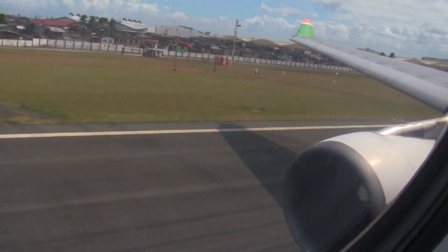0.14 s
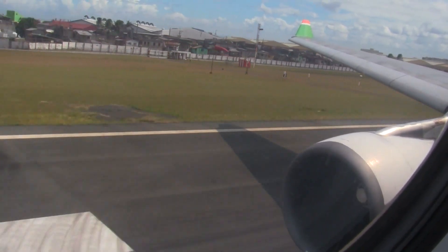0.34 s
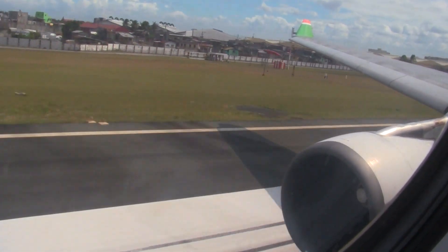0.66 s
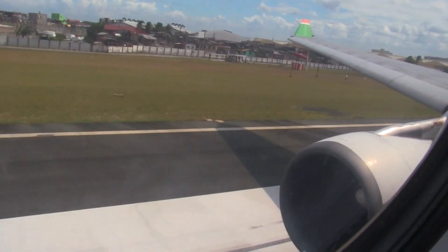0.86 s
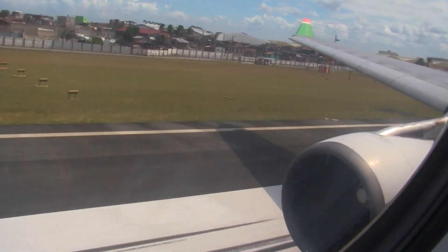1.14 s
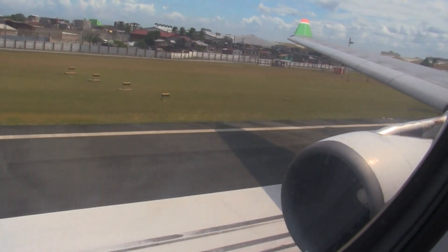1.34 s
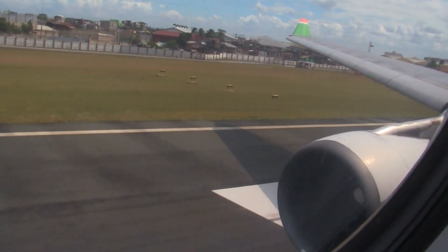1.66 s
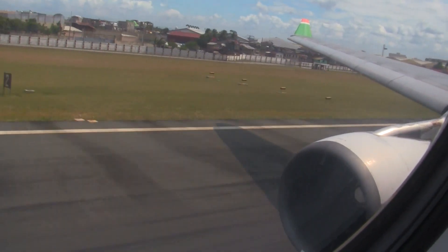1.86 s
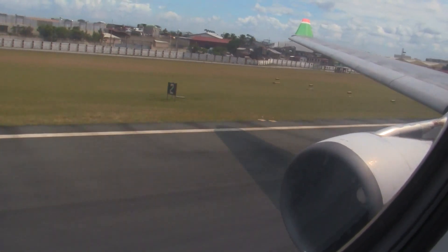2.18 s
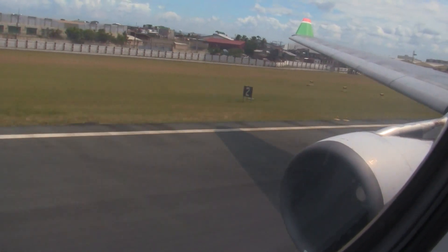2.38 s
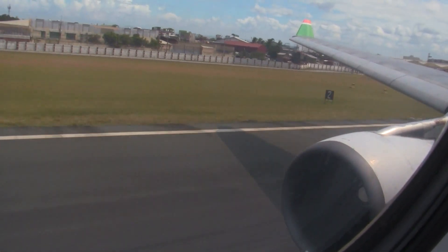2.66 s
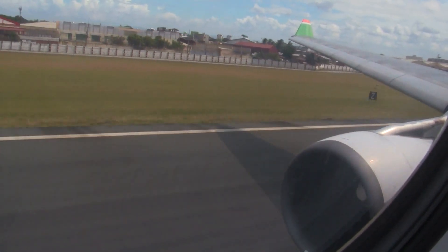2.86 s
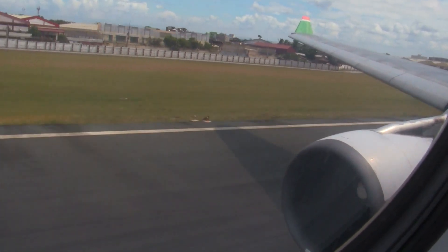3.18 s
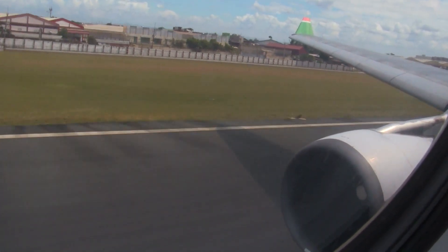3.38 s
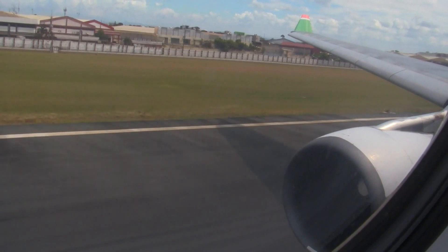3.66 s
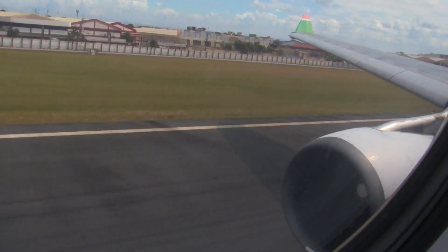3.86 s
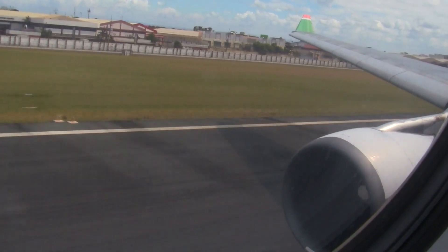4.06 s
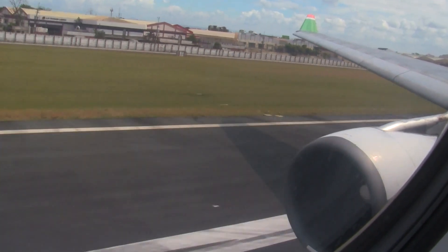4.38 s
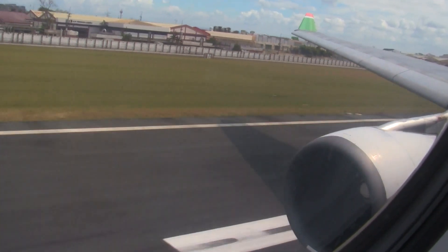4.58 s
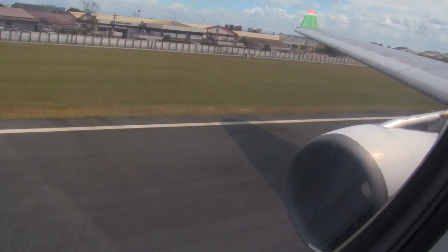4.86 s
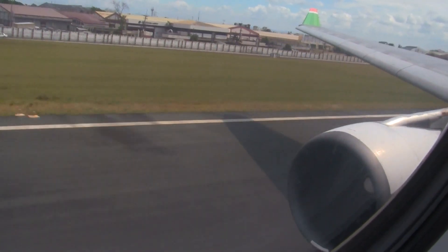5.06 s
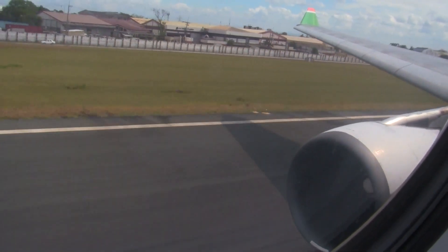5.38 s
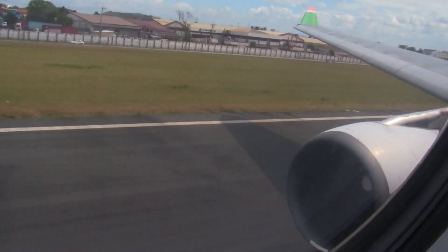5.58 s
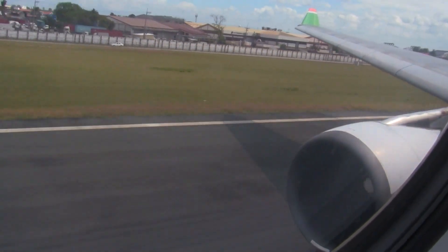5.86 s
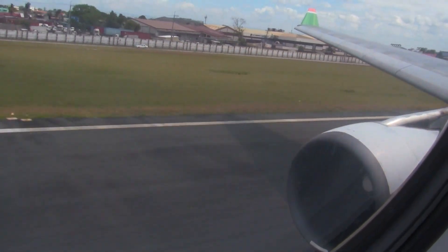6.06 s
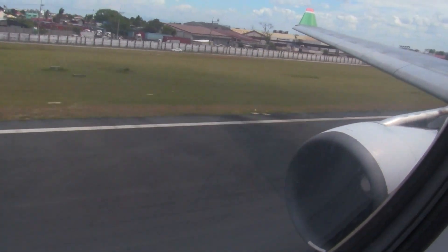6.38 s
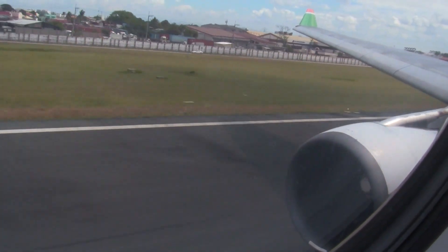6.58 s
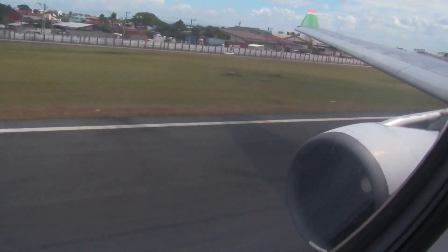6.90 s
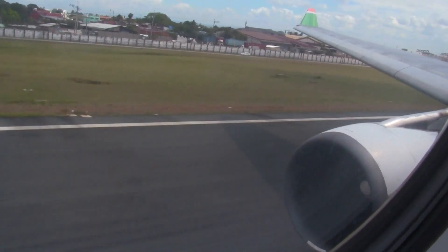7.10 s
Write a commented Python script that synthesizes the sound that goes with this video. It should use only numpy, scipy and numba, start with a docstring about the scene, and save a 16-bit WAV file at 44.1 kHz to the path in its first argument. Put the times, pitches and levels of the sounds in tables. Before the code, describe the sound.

Inside an airliner speeding down a runway, a jet engine roars, buzzes and whines at full thrust over a booming rumble and repeated dull thumps.

```python
"""Airliner cabin, take-off run

From inside the cabin, close beside a big fan engine at full thrust, on a small camera's stereo microphone.
Jet and airflow roar and the cabin air booms near 115 Hz. The fan sings its blade tone and a comb of shaft
orders. Low thumps come and go, the later, evenly spaced ones probably wheels on runway joints.
Loose trim ticks and squeaks, and the camera's limiter ducks everything under the heavy thumps."""
import sys
import numpy as np
from scipy import signal
from scipy.fft import rfft, irfft, next_fast_len
from scipy.io import wavfile
from scipy.ndimage import uniform_filter1d
from numba import njit

SR = 44100
rng = np.random.default_rng(int(sys.argv[2]) if len(sys.argv) > 2 else 0)


def log_audio(samples):
    """Write samples as a 16-bit WAV file to the path given in sys.argv[1]."""
    # one column per channel
    frames = np.atleast_2d(samples).T
    # limit to full scale, then quantise
    limited = np.clip(frames, -1, 1)
    pcm = np.round(limited * 32767).astype(np.int16)
    wavfile.write(sys.argv[1], SR, pcm)


N = 318843

# microphone self-noise spectrum: f/Hz, relative density/dB
HISS_SPECTRUM = [(3000, -30), (5500, -8), (7500, 0), (11500, -3), (13000, -11), (15600, -34)]
# loudness of the roar as heard, including brief ducks at the thumps:
# t/s, level at 2.4-9 kHz/dB, rumble/dB (only its swing about the mean counts)
ROAR_AS_HEARD = [(0, -42, 29), (.11, -44.5, 28.5), (.2, -40, 28.5), (.4, -43.5, 28), (.5, -42.5, 26),
                 (.65, -46, 27.5), (.8, -42, 27.5), (1.02, -40.5, 26.5), (1.1, -41, 27.5),
                 (1.25, -39.5, 27), (1.47, -37.5, 28.5), (1.68, -45.5, 27), (1.8, -41.5, 28), (2, -41, 27),
                 (2.09, -42.5, 28.5), (2.2, -40.5, 27.5), (2.4, -41, 26.5), (2.65, -44.5, 27.5),
                 (2.75, -41, 25), (2.8, -44.5, 30.5), (2.9, -41, 27), (3.2, -45.5, 29.5),
                 (3.35, -40.5, 27.5), (3.42, -45, 28), (3.6, -42, 27), (3.76, -45, 27.5), (4, -41, 27.5),
                 (4.15, -41.5, 27.5), (4.3, -45, 27.5), (4.5, -43, 24.5), (4.67, -42.5, 29.5),
                 (4.69, -46, 26), (4.74, -48, 25), (4.8, -46, 27.5), (4.88, -44, 20.5), (4.95, -44, 24.5),
                 (5.02, -45.5, 23), (5.17, -44.5, 27.5), (5.28, -46.5, 23.5), (5.4, -43.5, 23.5),
                 (5.55, -43.5, 24), (5.68, -44, 25.5), (5.75, -45.5, 24), (5.93, -42.5, 24),
                 (6.03, -45.5, 23.5), (6.15, -43.5, 25), (6.28, -48, 27), (6.43, -44, 26.5),
                 (6.54, -48, 24), (6.65, -45, 26.5), (6.8, -43, 27.5), (7, -42, 28), (7.23, -41, 29)]
# roar spectrum in the cabin: f/Hz, relative density/dB
ROAR_SPECTRUM = [(15, -52.5), (25, -28), (50, -13.5), (90, -6.5), (160, -6), (195, -9.5), (228, -7),
                 (260, -14), (340, -15), (483, -23.5), (900, -32), (1310, -39.5), (2200, -43),
                 (2600, -49.5), (4600, -54.5), (5900, -56), (7500, -63), (10000, -68), (11200, -74),
                 (12500, -81.5)]
# stereo width of the roar: f/Hz, side minus mid/dB
ROAR_WIDTH = [(25, -30.5), (80, -34.5), (250, -26.5), (600, -18), (1100, -17.5), (2500, -17), (5000, -33.5),
              (8000, -7)]
# steady whine, probably a pump: t/s, level/dB
PUMP_LEVEL = [(0, -44), (.35, -32), (.6, -37), (.8, -33), (1.45, -34.5), (1.7, -36.5), (2, -36.5),
              (2.3, -37), (2.45, -32.5), (2.7, -39.5), (3.3, -35), (3.6, -36), (4.05, -31.5), (4.5, -42),
              (4.75, -44), (5, -43), (5.3, -44), (5.5, -37), (5.8, -43), (6.15, -37.5), (6.5, -43.5),
              (7, -37), (7.23, -35)]
# brief hum at the start: t/s, f/Hz, level/dB
BRIEF_HUM = [(0, 551, -34), (.2, 555, -25.5), (.45, 565, -29.5), (.62, 549.4, -29.5), (.7, 567, -60)]
# loose trim ticking: t/s, peak level/dB, centre f/Hz, bandwidth/Hz, length/s
TRIM_TICKS = [(0.125, -43, 6100, 300, 0.05), (.152, -41, 9000, 7000, .01), (0.617, -47, 10900, 1200, .011),
              (2.732, -40, 8060, 3960, 0.02), (4.41, -40, 7090, 3998, 0.014),
              (4.907, -30, 4490, 2000, 0.017), (4.922, -28, 3600, 2940, 0.015),
              (4.923, -32, 1490, 1500, 0.03), (5.68, -48, 9000, 7000, .03), (5.802, -48, 10000, 2500, .01)]
# loose trim squeaking: t/s, level/dB, f/Hz, length/s
TRIM_SQUEAKS = [(5.15, -47, 6200, .042), (5.673, -44, 6180, 0.033)]
# boom of the cabin air: t/s, f/Hz, level/dB
CABIN_BOOM = [(0, 110.4, -20), (.45, 119.6, -9.5), (.65, 123.5, -21), (1.2, 118.4, -29), (1.7, 119.2, -22),
              (1.9, 113.4, -12), (2.8, 116, -11), (3, 125.6, -20.5), (3.3, 117.8, -12.5), (3.8, 120, -18),
              (4, 112.5, -19), (4.3, 122, -12), (4.55, 112.1, -19), (4.72, 114.7, -15), (4.8, 115.4, -37),
              (4.98, 114.3, -19), (5.02, 116, -12), (5.12, 116.2, -15.5), (5.27, 117.5, -13),
              (5.4, 118, -16), (5.47, 113, -22), (5.53, 113.4, -13), (5.6, 111.9, -13.5),
              (5.8, 111.6, -9.5), (5.99, 113.1, -11), (6.04, 113.8, -12.5), (6.12, 113.8, -7),
              (6.17, 113.7, -12), (6.24, 113.3, -6.5), (6.32, 114.5, -18), (6.4, 113.4, -9),
              (6.55, 113.7, -11), (6.9, 116, -9), (7.05, 124, -23), (7.23, 114.7, -13.5)]
# lower hum, climbing with ground speed for most of the run: t/s, f/Hz, level/dB
LOW_HUM = [(0, 89.3, -11.5), (.5, 89.9, -39), (.65, 77.2, -17), (1, 78, -15.5), (2.2, 82, -19.5),
           (2.8, 82.1, -21), (3.1, 84, -18.5), (4.45, 87, -11.5), (4.7, 88.64, -14), (4.8, 88.3, -22),
           (5, 88.4, -17.5), (5.3, 88.4, -19), (5.6, 91.95, -14.5), (6.5, 93.76, -18.5), (6.8, 75.7, -22.5),
           (7.23, 76.1, -16)]
# low thumps and surges of the cabin boom; the later, evenly spaced ones probably wheels on runway joints:
# t/s, peak level/dB
LOW_THUMPS = [(0.475, -4), (0.604, -7), (0.838, 1), (1.054, 2), (1.189, 2.5), (1.494, 3), (1.609, -2),
              (1.856, -2), (2.052, 2.5), (2.632, -2.5), (2.784, 0.5), (2.906, 0), (3.07, -2), (3.192, 0.5),
              (3.401, -2.5), (3.55, -7), (3.682, -1.5), (3.848, 2), (4.251, -9), (4.35, -2.5), (4.42, 3),
              (4.456, -1), (4.682, 5), (4.872, -4.5), (4.945, 3.5), (5.095, -5), (5.142, -4.5),
              (5.219, 2.5), (5.461, -2.5), (5.707, 0.5), (5.957, 3.5), (6.232, -1.5), (6.461, 0.5),
              (7.119, -9)]
# low cabin modes rung by a thump: f/Hz, relative level/dB
CABIN_MODES = [(117.6, 0), (85, -9)]
# tones of shock waves at unequal blade tips: multiple of the shaft rate
COMB_ORDERS = [5, 7, 11, 16, 21, 22, 25, 26, 27, 29, 30, 31, 32, 33, 35, 37, 38, 40, 42, 44, 45, 46, 47, 55,
               57, 59, 60, 63, 71, 72, 73, 102]
# strength of each of those orders: relative level/dB
COMB_ORDER_DB = [15, 6, -4.5, -17.5, -8.5, -14.5, -14, -12, -15.5, -8.5, -14, -17, -17.5, -11.5, -15, -10.5,
                 -13.5, -14.5, -23, -24.5, -27.5, -23.5, -18, -29, -22.5, -19, -19.5, -19.5, -28, -20.5,
                 -22, -18]
# how strongly the whole comb comes through: t/s, level above the roar/dB
COMB_LEVEL = [(0, 4), (.65, 1.5), (.8, 4.5), (1.4, 3.5), (2.1, 5), (2.5, 2.5), (3.5, 3.5), (4.5, 2.3),
              (5.5, -0.7), (6.5, 5), (7.23, 3)]
# one strong shaft order above the blade tone, swelling on its own: t/s, level/dB
LONE_ORDER_LEVEL = [(0.03, -52), (0.39, -56), (0.61, -46), (0.69, -63), (0.75, -40), (1.57, -38),
                    (1.7, -53), (1.81, -39), (1.99, -35.5), (2.07, -61), (2.32, -43.5), (2.57, -50),
                    (2.61, -41), (2.77, -49), (2.88, -42), (2.92, -52), (3.62, -41), (3.66, -47),
                    (3.98, -43), (4.8, -49), (4.88, -44), (4.98, -50), (6.2, -45), (6.26, -58), (6.44, -40),
                    (6.48, -55), (6.74, -45.5), (7.2, -48)]
# blade-passing tone: t/s, level/dB
BLADE_LEVEL = [(0.0, -49), (0.04, -32.5), (0.12, -33), (0.19, -31.5), (0.26, -35), (0.34, -41), (0.54, -32),
               (0.64, -48), (0.72, -42), (0.76, -33), (0.84, -32.5), (0.93, -31.5), (1.02, -31),
               (1.08, -32), (1.17, -29), (1.21, -35), (1.31, -29.5), (1.39, -33), (1.45, -27), (1.49, -40),
               (1.55, -32.5), (1.75, -45.5), (1.81, -29), (2.03, -29), (2.09, -42), (2.15, -28),
               (2.29, -35), (2.31, -23.5), (2.41, -34), (2.62, -31), (2.68, -38), (2.86, -28.5),
               (3.26, -35.5), (3.34, -25.5), (3.42, -35.5), (3.5, -31.5), (3.62, -29), (3.66, -39),
               (3.81, -30), (4.41, -31.5), (4.45, -40), (4.61, -34.5), (4.71, -49), (4.75, -40),
               (4.89, -42), (4.95, -50), (5.13, -41), (5.23, -45), (5.44, -34), (5.52, -48), (5.58, -36),
               (5.7, -38), (5.74, -55), (5.82, -43), (5.87, -50), (5.9, -33), (5.94, -33), (5.98, -40),
               (6.04, -32), (6.08, -39), (6.11, -33.5), (6.16, -30), (6.3, -52), (6.4, -31.5), (6.52, -59),
               (6.56, -42), (6.64, -40.5), (6.72, -40.5), (6.8, -36.5), (6.86, -33), (6.92, -34),
               (6.97, -29), (7, -38), (7.04, -30), (7.1, -33.5), (7.15, -25), (7.23, -36)]
# octave of the blade tone, which comes and goes: t/s, level/dB
BLADE_OCTAVE_LEVEL = [(0.03, -63), (0.07, -53), (0.67, -56), (0.83, -55), (0.87, -63), (0.93, -48),
                      (1.09, -59), (1.19, -43), (1.23, -58), (1.49, -46), (1.7, -62), (1.79, -53),
                      (1.81, -60), (2.32, -52), (2.53, -55.5), (3.33, -54.5), (3.46, -61), (3.5, -47),
                      (3.58, -55), (4.66, -55), (4.74, -63), (4.92, -47), (4.96, -65), (5.02, -53),
                      (5.48, -57), (5.7, -50), (5.74, -57), (5.92, -54), (6.0, -68), (6.16, -52),
                      (6.26, -60), (6.44, -50), (6.54, -60), (6.6, -53), (7.16, -52), (7.2, -57)]

SHAFT_HZ, BLADES, LONE_ORDER = 56.23, 34, 39
PUMP_HZ, HISS_DB, SQUEAK_OCTAVE_DB = 813, -66, -21
THUMP_SWELL_S, THUMP_RING_S = .014, .033
RATTLE_DB, RATTLE_LEAD_S, RATTLE_S, RATTLE_HZ, RATTLE_WIDTH_HZ = -26, .05, .06, 330, 600
LIMIT_DB, LIMIT_STEP_DB, RELEASE_S, TOP_HZ = -.5, .11, .068, 15700
TRIM_PAN = np.array([[1.2], [.8]])  # left of the microphone


def undb(db):
    return 10 ** (np.asarray(db) / 20)


def at_rms(x, db):
    return x * undb(db) / np.sqrt(np.mean(x ** 2))


def curves(table):
    """Columns of a table joined by straight lines in time."""
    times, *columns = np.transpose(table)
    return [np.interp(np.arange(N) / SR, times, column) for column in columns]


def walk(rate):
    """Random levels held 1 / rate s and smoothed twice; spread near 1."""
    hold = int(SR / rate)
    steps = np.repeat(rng.standard_normal(N // hold + 1), hold)
    return 1.27 * uniform_filter1d(uniform_filter1d(steps, hold), hold)[:N]


def tone(hz, wobble=0.):
    """Sine of rms 1 that follows a pitch curve, its phase pushed about by wobble radians."""
    return np.sqrt(2) * np.sin(2 * np.pi * (np.cumsum(hz) / SR + rng.random()) + wobble)


def spectrum_gain(table, hz):
    """Gain of an (f/Hz, level/dB) table at the given frequencies."""
    f, db = np.transpose(table)
    return undb(np.interp(np.log(hz + 1), np.log(f), db))


def resonate(noise, hz, width_hz):
    """Noise passed twice through one resonance."""
    band = signal.iirpeak(hz, hz / width_hz, SR)
    return signal.lfilter(*band, signal.lfilter(*band, noise))


def arch(t, length):
    """Half-sine envelope from t = 0 to length."""
    return np.sin(np.pi * np.clip(t / length, 0, 1))


@njit
def limiter_gain(peak, ceiling, release, overshoot):
    """Gain that drops at once under a peak and creeps back."""
    gain, held = np.empty(len(peak)), ceiling
    for i in range(len(peak)):
        held = peak[i] * overshoot if peak[i] > held else held + (ceiling - held) * release
        gain[i] = ceiling / held
    return gain


def microphone_hiss():
    """Each side of the microphone adds its own faint, even hiss."""
    size = next_fast_len(N)
    hz = np.arange(size // 2 + 1) * SR / size
    noise = rfft(rng.standard_normal((2, size))) * spectrum_gain(HISS_SPECTRUM, hz)
    return at_rms(irfft(noise, size)[:, :N], HISS_DB)


def jet_roar(roar_db, rumble_db):
    """Jet and airflow noise as heard, with brief ducks; octave bands flicker, low ones follow the rumble."""
    size = next_fast_len(N)
    hz = np.arange(size // 2 + 1) * SR / size
    mid, side = rfft(rng.standard_normal((2, size))) * spectrum_gain(ROAR_SPECTRUM, hz)
    stereo = mid + side * spectrum_gain(ROAR_WIDTH, hz) * np.array([[1], [-1]])
    treble_rms = np.std(irfft(mid * ((hz > 2400) & (hz < 9000)), size))
    gust_db = .2 * walk(16) + .76 * walk(30)
    speed_db = np.linspace(-1.1, 1.1, N)
    out = 0
    for centre in 15 * 2. ** np.arange(11):
        band = np.cos(np.pi / 2 * np.clip(np.log2((hz + 1) / centre), -1, 1)) ** 2
        low = np.clip(np.log2(1600 / centre) / 3.4, 0, 1)
        deep = np.clip(np.log2(150 / centre) / 2.4, 0, 1)
        swing_db = roar_db - np.mean(roar_db) + gust_db + low * (rumble_db - np.mean(rumble_db))
        # the deepest bands duck less and swell with speed
        db = (1 - .68 * deep) * swing_db + deep * speed_db + .55 * walk(15)
        out = out + irfft(stereo * band, size)[:, :N] * undb(db)
    return out / treble_rms * undb(np.mean(roar_db))


def hum_and_whine():
    """A brief hum just left of centre and a whine of steady pitch, probably a pump."""
    hz, db = curves(BRIEF_HUM)
    hum = tone(hz) * undb(db) * np.array([[1.1], [.9]])
    whine = tone(np.full(N, PUMP_HZ), .38 * walk(7)) * undb(curves(PUMP_LEVEL)[0])
    return hum + whine


def trim_ticks():
    """Short bursts of noise ring in loose trim."""
    out, t = np.zeros((2, N)), np.arange(4096) / SR
    for start, db, hz, width, length in TRIM_TICKS:
        ring = resonate(rng.standard_normal(len(t)), hz, width) * arch(t, length)
        at = int(start * SR)
        out[:, at:at + len(t)] += ring / np.abs(ring).max() * undb(db) * TRIM_PAN
    return out


def trim_squeaks():
    """Loose trim rubs: short wavering tones, each with its octave."""
    out, t, waver = 0, np.arange(N) / SR, 1.2 * walk(150)
    for start, db, hz, length in TRIM_SQUEAKS:
        phase = 2 * np.pi * hz * t + waver
        swell = np.sqrt(arch(t - start, length).clip(0))
        out = out + undb(db) * swell * (np.sin(phase) + undb(SQUEAK_OCTAVE_DB) * np.sin(2 * phase))
    return out * TRIM_PAN


def cabin_boom():
    """The cabin air booms around the microphone with a lower hum beneath it; both waver."""
    boom_hz, boom_db = curves(CABIN_BOOM)
    hum_hz, hum_db = curves(LOW_HUM)
    boom = tone(boom_hz, .5 * walk(22)) * undb(boom_db + 2 * walk(30))
    hum = tone(hum_hz, .98 * walk(20)) * undb(hum_db + 3.1 * walk(20))
    return boom + hum


def low_thumps():
    """Each thump opens with a rattle, then swells and dies in the cabin's low modes, in step at the peak."""
    out, t = np.zeros(N + 8192), np.arange(8192) / SR
    rise = np.sin(np.pi / 2 * np.clip(t / THUMP_SWELL_S, 0, 1))
    fall = np.exp(-(np.maximum(t - THUMP_SWELL_S, 0) / THUMP_RING_S) ** 2)
    modes = sum(undb(db) * np.cos(2 * np.pi * hz * (t - THUMP_SWELL_S)) for hz, db in CABIN_MODES)
    ring = rise * fall * modes
    ring /= np.abs(ring).max()
    noise = rng.standard_normal((len(LOW_THUMPS), len(t)))
    rattles = at_rms(resonate(noise, RATTLE_HZ, RATTLE_WIDTH_HZ), RATTLE_DB) * arch(t, RATTLE_S)
    for (peak_s, db), rattle in zip(LOW_THUMPS, rattles):
        for lead_s, sound in ((THUMP_SWELL_S, ring), (RATTLE_LEAD_S, rattle)):
            at = int((peak_s - lead_s) * SR)
            out[at:at + len(t)] += sound * undb(db)
    return out[:N]


def shaft_comb(shaft, ports, roar_db):
    """Shock waves at unequal blade tips sound at multiples of the shaft rate."""
    slow, quick = [walk(4) for _ in range(6)], [walk(90) for _ in range(3)]
    comb = 0
    for i, (order, db) in enumerate(zip(COMB_ORDERS, COMB_ORDER_DB)):
        scatter = order / BLADES  # higher orders are scattered more
        phase = order * shaft + i ** 2 + 1.1 * slow[i % 6] + .42 * scatter ** 1.9 * quick[i % 3]
        gain = undb(db + 1.2 * slow[(i + 3) % 6][::-1] + 1.7 * min(scatter, 1.6) * quick[i % 3][::-1])
        comb = comb + gain * np.sin(phase + .058 * scatter * ports)
    lone = np.sin(LONE_ORDER * shaft + .44 * walk(12) + .5 * walk(70) + .06 * ports)
    lone *= undb(curves(LONE_ORDER_LEVEL)[0] + 1.5 * walk(60))
    return comb * undb(roar_db + curves(COMB_LEVEL)[0]) + lone


def engine_fan(roar_db):
    """Blade tone, octave and shaft orders; each wavers as it crosses the turbulent air and the wall."""
    shaft = 2 * np.pi * SHAFT_HZ * np.arange(N) / SR  # the heavy rotor turns evenly
    ports = np.array([[1], [-1]])  # short waves reach the two microphone ports a little apart
    blade = np.sin(BLADES * shaft + walk(30) + .3 * walk(140) + .29 * ports)
    flutter_db = 1.8 * walk(50) + 2.4 * walk(110)
    blade *= undb(curves(BLADE_LEVEL)[0] + flutter_db)
    comb = shaft_comb(shaft, ports, roar_db)
    octave = np.sin(2 * BLADES * shaft + 1.4 * walk(25) + .3 * walk(100) + .09 * ports)
    octave *= undb(curves(BLADE_OCTAVE_LEVEL)[0] + flutter_db[::-1])
    return np.sqrt(2) * (blade + octave + comb)  # levels are rms


def scene():
    """The cabin as heard beside the engine, with the microphone's own hiss."""
    roar_db, rumble_db = curves(ROAR_AS_HEARD)
    cabin = jet_roar(roar_db, rumble_db) + cabin_boom() + low_thumps()
    return cabin + engine_fan(roar_db) + hum_and_whine() + trim_ticks() + trim_squeaks() + microphone_hiss()


def record(dry):
    """The microphone fades above 12 kHz; the limiter steps down on peaks with faint clicks; the top is cut."""
    capsule = signal.sosfilt(signal.butter(4, 12500, fs=SR, output="sos"), dry)
    peak = np.abs(capsule).max(axis=0)
    gain = limiter_gain(peak, float(undb(LIMIT_DB)), 1 / (RELEASE_S * SR), float(undb(LIMIT_STEP_DB)))
    return signal.sosfilt(signal.ellip(8, .2, 70, TOP_HZ, fs=SR, output="sos"), capsule * gain)


dry = scene()
out = record(dry)
log_audio(out)
```